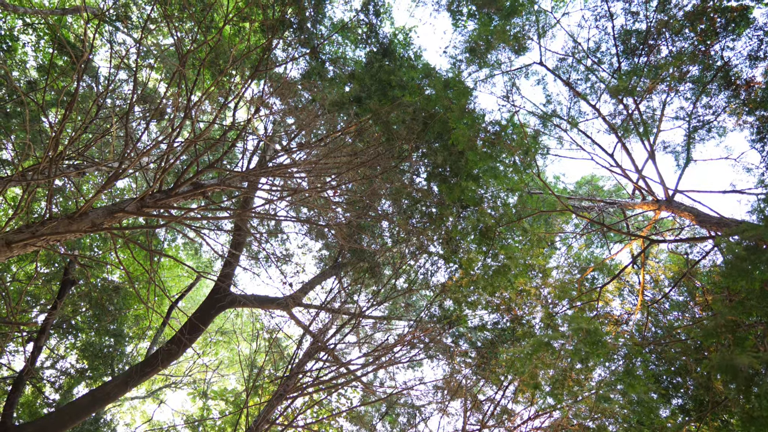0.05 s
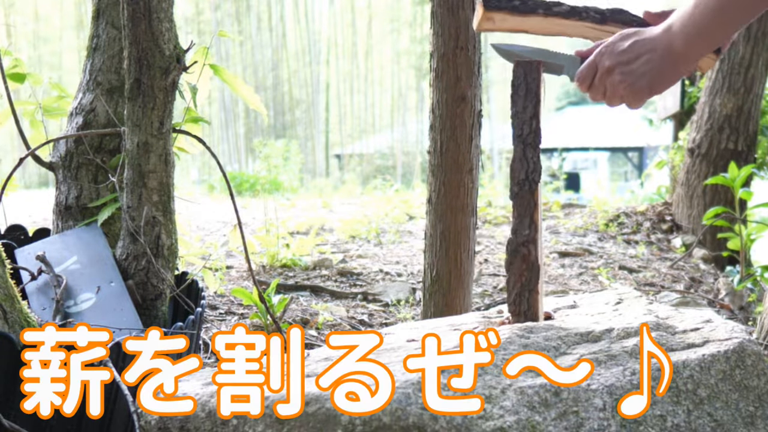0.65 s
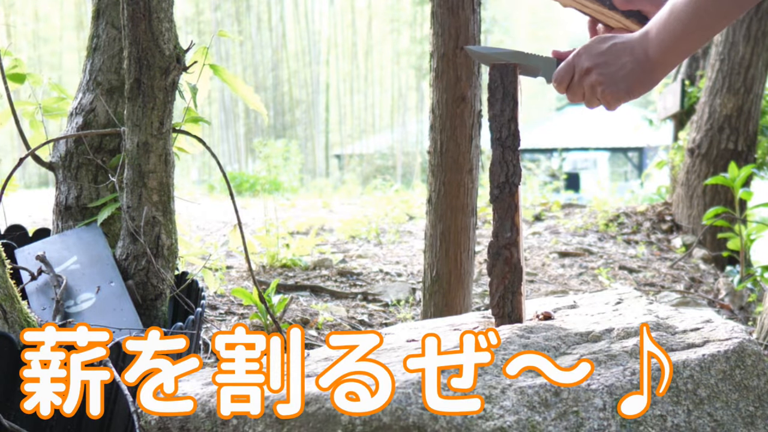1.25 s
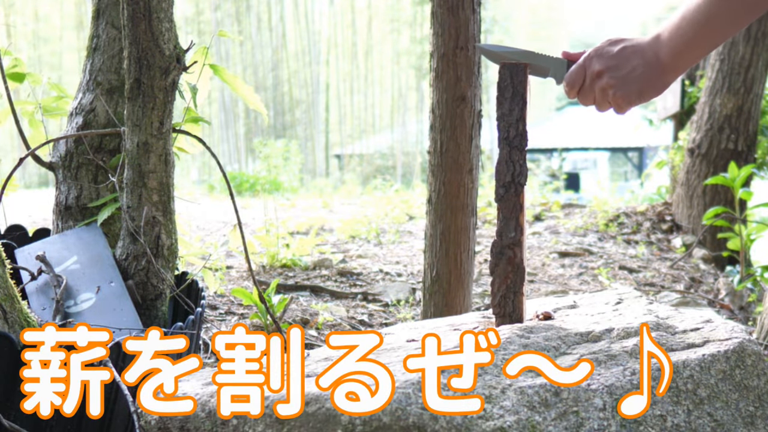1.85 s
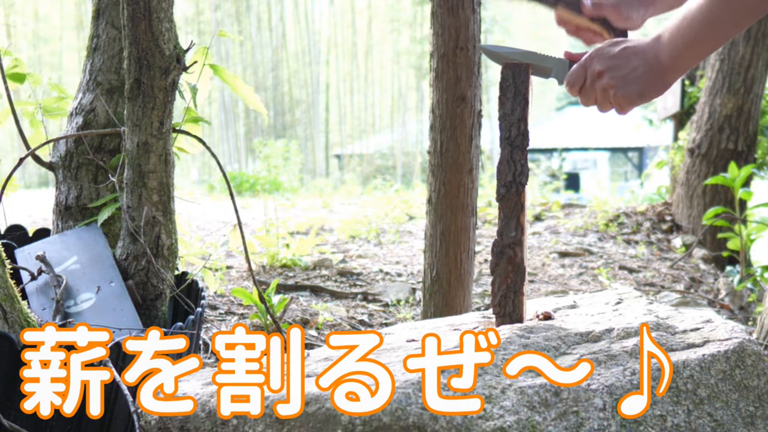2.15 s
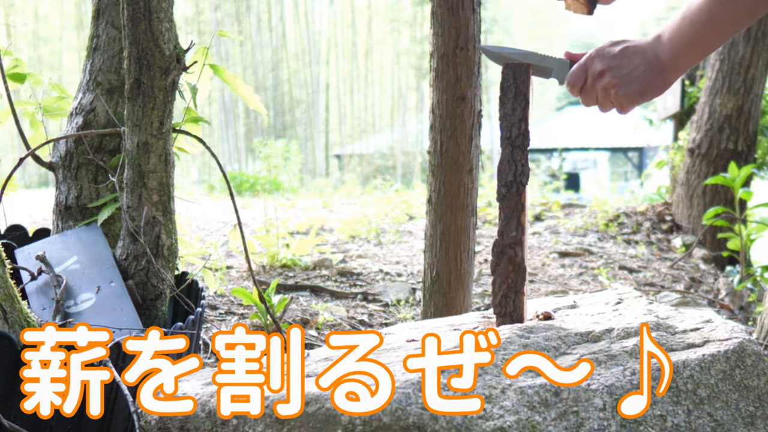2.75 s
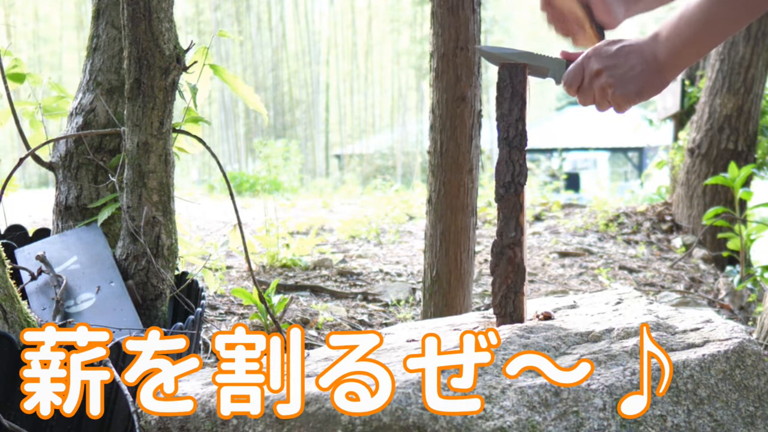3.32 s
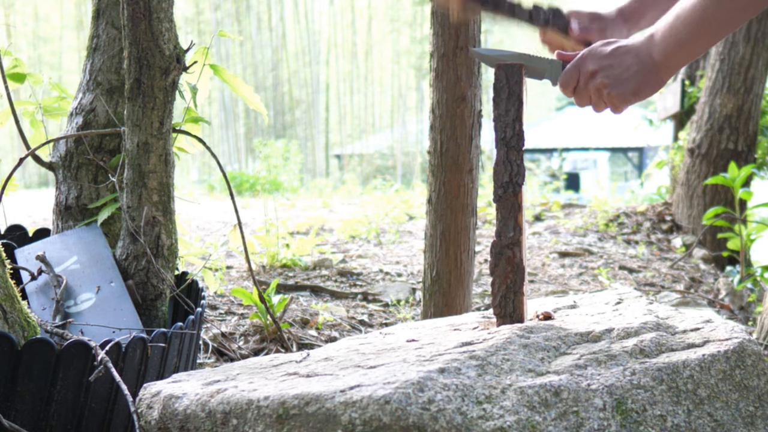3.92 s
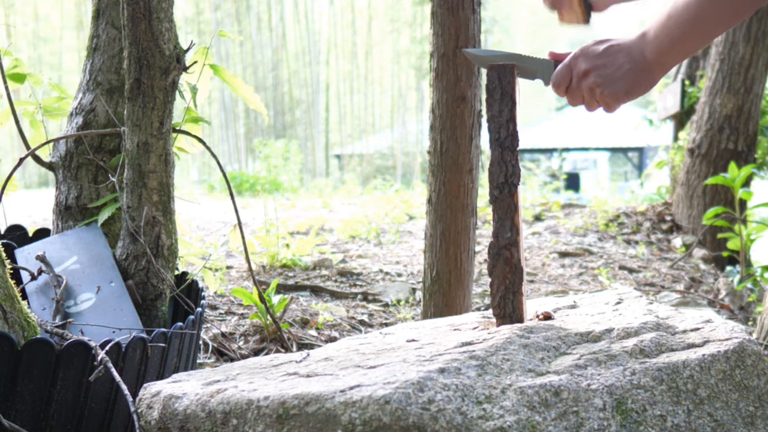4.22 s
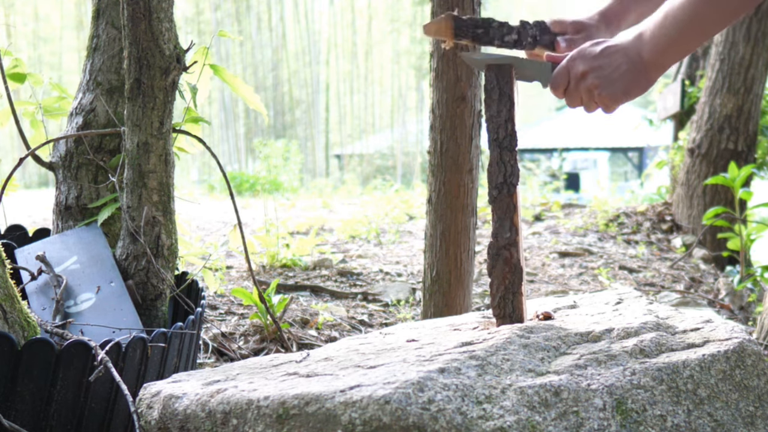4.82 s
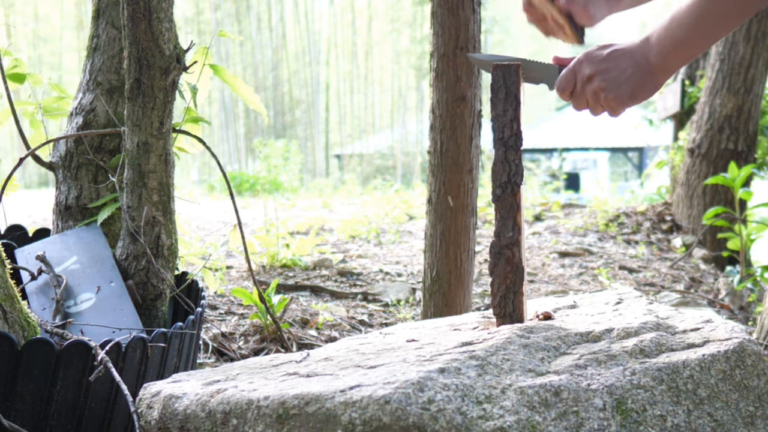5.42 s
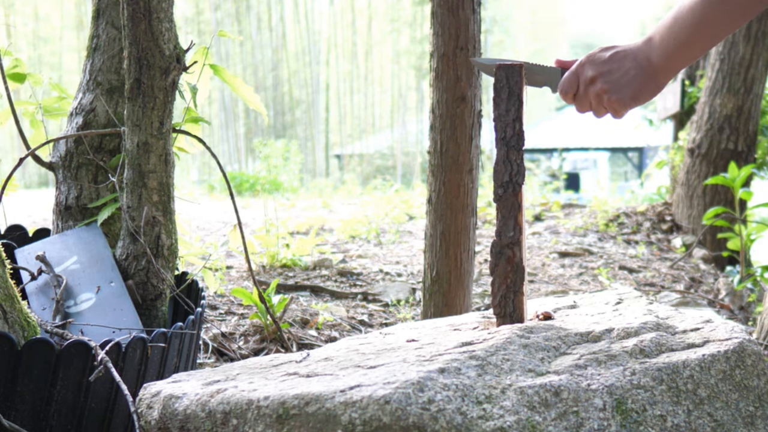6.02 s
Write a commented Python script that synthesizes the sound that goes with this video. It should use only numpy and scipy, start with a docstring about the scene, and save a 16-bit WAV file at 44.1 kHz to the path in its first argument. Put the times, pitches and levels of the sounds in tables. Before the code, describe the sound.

Steady, sharp wooden knocks with a splintery crack echo briefly among trees, over faint birdsong and soft forest air.

```python
"""A wooden baton knocks a knife into a stick that stands on a stone slab, in a quiet wood.
One light tap seats the blade, then nine harder blows follow. Each impact excites damped modes and a
crack of crushed fibres; the slab reflects it and the trees scatter it back. Small birds whistle over
a wash of air and leaves. The loudest blows overload the microphone, whose gain control ducks the
forest and slowly lets it return."""
import sys
import numpy as np
from scipy import signal
from scipy.fft import rfft, irfft
from scipy.io import wavfile
from scipy.ndimage import uniform_filter1d

SR = 44100
rng = np.random.default_rng(int(sys.argv[2]) if len(sys.argv) > 2 else 0)


def store_wav(level_fs):
    """Save 16-bit WAV to argv[1]."""
    pcm = np.round(np.clip(np.atleast_2d(level_fs), -1, 1) * 32767)
    wavfile.write(sys.argv[1], SR, pcm.T.astype(np.int16))


N = 272097
TIME = np.arange(N) / SR


def blows(contact_hz=5250, firm_db=1.2, soften_oct_per_db=0.24, scatter_db=2.0, slab_delay_s=0.0047):
    """Impact excitation: a blow rings the wood's modes; a weak one has a longer contact and less treble."""
    # Each row: start in seconds, force in dB, pitch factor, then the weights in dB that the point
    # of impact gives to the low thud, the hollow knock, the upper knock and the clack.
    strikes = [(0.9394, -12.5, 1.01, 17.5, 10, -1, -6), (2.0827, 0, 0.94, -13, 6, -9.5, -14),
               (2.503, 3, 0.95, 3, 0, -2.5, -0.5), (2.9410, 10, 0.97, 3.5, -12, -2, -2),
               (3.3973, 13, 1.03, -8.5, -23, -3.5, 0.5), (3.8503, 16.5, 1.003, -1.5, -21, -10, -6),
               (4.3199, 11, 0.99, 2, -1, -9, 1.5), (4.8106, 10, 1.03, -6, -2.5, 2.5, 1.5),
               (5.2905, 12.5, 1.014, -12.5, -23, -5.5, 1), (5.7836, 7, 1.03, -10.5, 9.5, 5.5, 5.5)]
    # Centres in Hz of the thud, the hollow knock, an unweighted middle, the upper knock and the clack.
    regions_hz = [500, 900, 1500, 1900, 3000]
    # Modes of baton, blade and stick. Each row: nominal frequency in Hz, level in dB, free t60 in seconds.
    wood_modes = [(377, -27.5, 0.032), (598, -16.5, 0.034), (794, -18, 0.014), (1083, -5, 0.02),
                  (1244, -5, 0.012), (1492, 2, 0.017), (1655, -20, 0.044), (1858, -3, 0.019),
                  (2460, -36, 0.033), (2520, -8, 0.02), (2690, -5.5, 0.039), (3040, -3, 0.024),
                  (3460, -23.5, 0.033), (3860, -1.5, 0.03), (4450, -5, 0.033), (5367, -7.5, 0.021),
                  (6500, -16, .008), (7200, -9.5, 0.00294), (9580, -6, 0.0074), (11770, -22, .004),
                  (13900, -26.5, 0.0031)]
    # Spectrum of crushed fibres. Each row: frequency in Hz, level in dB.
    crack_spectrum = [(200, -25), (1000, -30), (3000, 22.5), (6000, 19), (10000, 10), (16000, -6)]
    # Reverberation among the trunks. Each row: frequency in Hz, level in dB, t60 in seconds.
    trunk_bands = [(200, -26.5, 0.2), (700, -10, 0.24), (1130, -7.5, 0.52), (1540, -3.5, 0.92),
                   (1920, -2.5, 0.62), (2310, -11, 1), (2930, -5.5, 0.73), (4050, -9, 0.72),
                   (5300, -10, 0.56), (6800, -22.5, 0.63), (9570, -22, 0.28), (16000, -29, .22)]
    out, t = np.zeros(N), np.arange(4096) / SR
    hz, db, free_t60 = np.transpose(wood_modes)
    t60 = np.minimum(free_t60, 44 / hz)  # gripped wood rings for a few dozen cycles at most
    tearing = amp(-7) * fade(t, 0.0053) + amp(-20) * fade(t, 0.049)  # a crack, then fibres parting
    radiation = signal.butter(3, 260, "high", fs=SR)  # a thin stick radiates little bass
    for start, force_db, pitch, thud, hollow, upper, clack in strikes:
        place = list(zip(regions_hz, [thud, hollow, 0, upper, clack]))
        mode_db = db + value_at(place, hz) + scatter_db * rng.standard_normal(len(hz))
        knock = ring(zip(hz * pitch, mode_db, t60), t)
        knock += noise(crack_spectrum, len(t)) * tearing
        corner_hz = contact_hz * 2 ** (soften_oct_per_db * min(force_db - firm_db, 0))
        contact = signal.butter(1, corner_hz, fs=SR)
        knock = amp(force_db) * signal.lfilter(*contact, knock)
        knock = signal.lfilter(*radiation, knock)
        add(out, start, knock)
        add(out, start + slab_delay_s, amp(-13) * knock)  # reflection off the stone
        # the trees receive the blow from every side, so only its broad colour returns
        colour = amp(0.78 * value_at(place, np.fft.rfftfreq(SR, 1 / SR)))
        scattered = irfft(rfft(tree_echo(trunk_bands)) * colour, SR)
        add(out, start, amp(force_db) * signal.lfilter(*contact, scattered))
    return out


def ring(modes, t):
    """Modal superposition: damped sines start together, neighbouring modes in opposite phase."""
    return sum((-1) ** k * amp(db) * fade(t, t60) * np.sin(2 * np.pi * hz * t)
               for k, (hz, db, t60) in enumerate(modes))


def tree_echo(bands, near_db=6, near_t60=0.19, onset_s=0.0017):
    """Diffuse scattering: an impulse response of energy 1, a burst from near trunks and a long thin tail."""
    hz, t, spectra = signal.stft(rng.standard_normal(SR), SR, nperseg=256)
    far = fade(t, value_at(bands, hz, column=2)[:, None])
    near = amp(near_db) * fade(t, near_t60)
    spectra = spectra * amp(value_at(bands, hz))[:, None] * (far + near)
    build_up = 1 - np.exp(-(TIME[:SR] / onset_s) ** 2)
    response = signal.istft(spectra)[1][:SR] * build_up
    return response / np.linalg.norm(response)


def landings():
    """Rebound: the stick hops and drops back on the slab, ringing its low modes in a dull bump."""
    # Each row: start in seconds, level in dB.
    bumps = [(3.89, -19.5), (5.31, -17), (5.815, -18.5)]
    # Modes of the foot on stone. Each row: frequency in Hz, level in dB, t60 in seconds.
    foot_modes = [(445, -2.5, 0.056), (375, -17, .04), (640, -11, .03), (1250, 1.5, 0.026)]
    out, t = np.zeros(N), np.arange(4096) / SR
    for start, db in bumps:
        add(out, start, amp(db) * ring(foot_modes, t))
    return out


def handling(grain_db=1.0, skirt_db=-24, tick_t60=0.017):
    """Friction and light contact: the shifting grip rubs out grainy noise; blade and bark tick."""
    # Dry slides of the hand. Each row: start in seconds, length in seconds, level in dB.
    slides = [(.15, 0.91, -58.5), (1.08, 0.16, -62), (1.29, .08, -61.5), (1.52, 0.33, -56)]
    # Each row: frequency in Hz, level in dB.
    friction_spectrum = [(3000, -34.5), (6000, -4), (8000, -5), (9500, -8), (11800, -3.5), (14000, -12),
                         (16000, -8)]
    # Each row: start in seconds, level in dB, centre frequency in Hz.
    ticks = [(.240, -44, 10000), (0.289, -32.5, 3650), (.3552, -41.5, 10100), (.4245, -46.5, 8000),
             (0.8946, -33.5, 5200), (0.937, -40.5, 10100), (1.079, -41, 4440), (1.1185, -43, 6500),
             (1.638, -48, 9000), (2.027, -48, 6000), (2.4449, -47, 11100), (2.8919, -47, 11100),
             (4.7765, -45, 11000)]
    rubbing = np.zeros(N)
    for start, length, db in slides:
        add(rubbing, start, amp(db) * swell(round(length * SR), peak=0.19))
    out = rubbing * amp(grain_db * wander(N, 83)) * noise(friction_spectrum, N)
    t = np.arange(2048) / SR
    for start, db, hz in ticks:
        band = [(hz / 3, skirt_db), (hz, 0), (hz * 3, skirt_db)]
        add(out, start, amp(db) * noise(band, len(t)) * fade(t, tick_t60))
    return out


def birds(echo_db=-8, near_waver=.01, far_waver=.045):
    """Direct and reverberant sound: far singers arrive mostly as echo, and their notes are buzzier."""
    # Each row: start and length in seconds, level in dB, gain of the direct path through the leaves
    # in dB, then the glide's nominal first pitch, last pitch and bow in Hz.
    notes = [(.41, 0.11, -46, -30.5, 5210, 3700, 100), (0.971, 0.081, -49, -30.5, 5700, 4760, 202),
             (1.464, 0.21, -50, -29.5, 3830, 4640, 101), (2.18, 0.038, -45, -3.5, 4480, 3780, -81),
             (2.673, 0.29, -42.5, -3.5, 4023, 4160, 240.5), (3.141, .13, -46, -4.5, 2945, 3150, 2),
             (3.263, 0.16, -40, -5.5, 3303, 3730, 200), (3.40, .11, -34, -14, 4140, 4560, 149),
             (3.539, .22, -43.5, -5.5, 3690, 3340, -190), (4.07, 0.15, -54, -28, 7100, 6750, -400),
             (5.49, .035, -43, 0, 3180, 4470, 98), (5.689, 0.029, -47, -2.5, 4300, 3880, 130)]
    # Reverberation of the canopy. Each row: frequency in Hz, level in dB, t60 in seconds.
    canopy_bands = [(2000, 7.5, 1), (5100, 5.5, 0.62), (10000, -9, .3)]
    direct, sung = np.zeros(N), np.zeros(N)
    for start, length, db, direct_db, *glide in notes:
        waver = np.interp(direct_db, [-30, -4], [far_waver, near_waver])
        tone = whistle(length, *glide, partials=[(0.99, 0)], waver=waver)
        tone = amp(db) * tone * swell(len(tone), peak=.26) ** 0.47  # the power rounds the swell
        add(direct, start, amp(direct_db) * tone)
        add(sung, start, tone)
    start, tone = reedy_call()
    add(direct, start, amp(-7) * tone)
    add(sung, start, tone)
    canopy = tree_echo(canopy_bands, near_db=-1.5, onset_s=0.00594)
    return direct + amp(echo_db) * signal.fftconvolve(sung, canopy)[:N]


def whistle(length, first_hz, last_hz, bow_hz, partials, waver, flutter_db=1.5):
    """Frequency and amplitude modulation: a glide with a parabolic bow, unsteady in pitch and level."""
    progress = np.linspace(0, 1, round(length * SR))
    hz = first_hz + (last_hz - first_hz) * progress + bow_hz * (1 - (2 * progress - 1) ** 2)
    cycles = np.cumsum(hz * (1 + waver * wander(len(hz), 83))) / SR
    tone = sum(amp(db) * np.sin(2 * np.pi * multiple * cycles) for multiple, db in partials)
    return unit(tone) * amp(flutter_db * wander(len(hz), 60))


def reedy_call(fade_db=25):
    """Missing fundamental: high harmonics alone make a thin call whose pitch and level arch together."""
    # One row: start and length in seconds, level in dB, top fundamental in Hz, drop at the ends in Hz.
    call = [(2.65, .235, -49, 872, 170)]
    # Each row: multiple of the fundamental, level in dB.
    harmonics = [(9, -10.5), (10, -5), (12, -3), (13, -7)]
    start, length, db, top_hz, drop_hz = call[0]
    end_hz = top_hz - drop_hz
    tone = whistle(length, end_hz, end_hz, drop_hz, harmonics, waver=.003)
    return start, tone * amp(db - fade_db * abs(np.linspace(-1, 1, len(tone))))


def insects(db=-58, until_s=.14):
    """Band-limited noise: a short, high sizzle at the start."""
    return amp(db) * noise([(5500, -31), (7000, -4), (8100, -1), (8900, -23)], N) * (TIME < until_s)


def forest(patchy_db=1.9):
    """Incoherent summation: distant air and leaves merge into noise that drifts in patches."""
    # Each row: frequency in Hz, spectral density in dB.
    wash_spectrum = [(12, -9), (35, 25), (60, 14), (120, -1.5), (250, 1.5), (500, 0.5), (900, 2.5),
                     (1400, -1), (2200, -5), (3300, -7.5), (4400, -7), (5500, -12.5), (6600, -23),
                     (10000, -31), (16000, -36.5)]
    # Each row: time in seconds, level in dB.
    levels = [(0, -39.5), (2, -40), (3.2, -37), (4.5, -40), (6.2, -43)]
    spectra = signal.stft(noise(wash_spectrum, N), nperseg=1024)[2]
    patches = uniform_filter1d(rng.standard_normal(spectra.shape), size=9, axis=0)  # smooth in frequency
    patches = unit(uniform_filter1d(patches, size=8, axis=1))  # and in time
    wash = unit(signal.istft(spectra * amp(patchy_db * patches))[1][:N])
    return wash * amp(np.interp(TIME, *np.transpose(levels)))


def amp(db):
    """Decibels to amplitude ratio."""
    return 10 ** (np.asarray(db) / 20)


def unit(x):
    """Normalisation to rms 1."""
    return x / np.sqrt(np.mean(x ** 2) + 1e-20)


def fade(t, t60):
    """Exponential decay by 60 dB in t60 seconds."""
    return np.exp(-np.log(1000) * t / np.maximum(t60, 1e-4))


def swell(size, peak):
    """Skewed half-sine envelope: rises to 1 over the share peak of its length, then falls to 0."""
    return np.sin(np.pi * np.interp(np.arange(size) / size, [0, peak, 1], [0, .5, 1]))


def value_at(points, hz, column=1):
    """Interpolation of one column of a spectrum table on a log-frequency axis."""
    table = np.array(points, float)
    return np.interp(np.log(hz + 1), np.log(table[:, 0] + 1), table[:, column])


def add(mix, start, sound):
    """Superposition: a sound joins the mix at start seconds."""
    part = mix[round(start * SR):][:len(sound)]
    part += sound[:len(part)]


def noise(spectrum, size):
    """Spectral shaping: white noise takes the given spectrum, at rms 1."""
    gain = amp(value_at(spectrum, np.fft.rfftfreq(size, 1 / SR)))
    return unit(irfft(rfft(rng.standard_normal(size)) * gain, size))


def wander(size, rate_hz):
    """Low-pass noise: a slow random fluctuation of rms 1."""
    lowpass = np.exp(-(np.fft.rfftfreq(size, 1 / SR) / rate_hz) ** 2)
    return unit(irfft(rfft(rng.standard_normal(size)) * lowpass, size))


def scene():
    """Superposition of close woodwork, far birds and the forest in one channel."""
    return (blows() + landings() + handling() + birds() + forest() + insects())[None]


def record(dry, threshold_db=3, recover_s=0.2, attack_s=0.0018, hiss_db=-69, edge_hz=16100):
    """Automatic gain control: it lags the loud blows, so they clip; hiss and band limits follow."""
    # Amplifier noise. Each row: frequency in Hz, spectral density in dB.
    hiss_spectrum = [(100, 2), (6000, 6.5), (10000, -2), (16000, -5.5)]
    over_db = np.maximum(20 * np.log10(abs(dry[0]) + 1e-9) - threshold_db, 1e-6)
    release = TIME / recover_s
    held_db = np.exp(np.maximum.accumulate(np.log(over_db) + release) - release)  # peaks, let go slowly
    lag = np.exp(-1 / (attack_s * SR))
    duck_db = signal.lfilter([1 - lag], [1, -lag], held_db)
    sound = np.clip(dry * amp(-duck_db), -.9, .9)
    sound += amp(hiss_db) * noise(hiss_spectrum, N)
    sound = signal.lfilter(*signal.butter(2, 120, "high", fs=SR), sound)
    sound *= (TIME < .139) | (TIME > .154)  # the sound drops out briefly
    lowpass = signal.firwin(255, edge_hz, window=("kaiser", 8), fs=SR)
    return signal.oaconvolve(sound, lowpass[None], "same")


dry = scene()
out = record(dry)
store_wav(out)
```